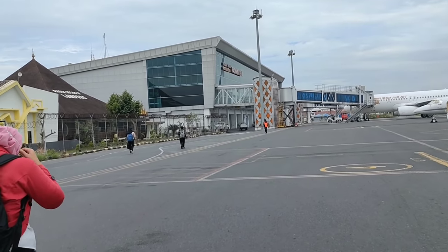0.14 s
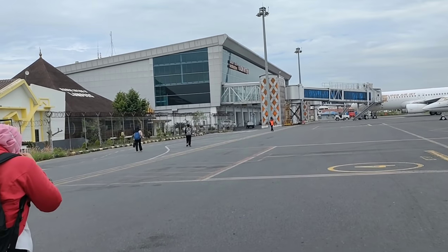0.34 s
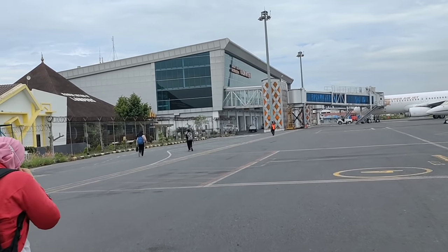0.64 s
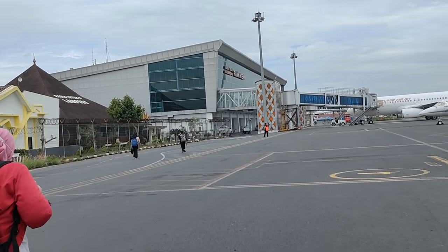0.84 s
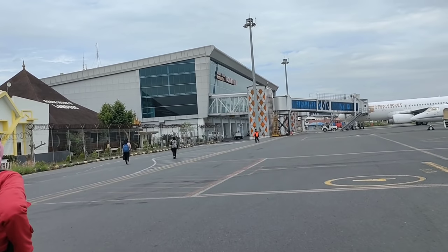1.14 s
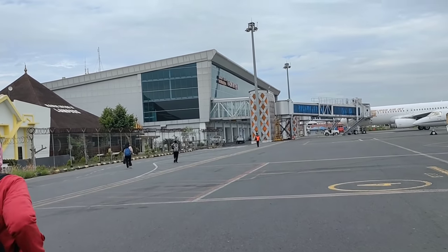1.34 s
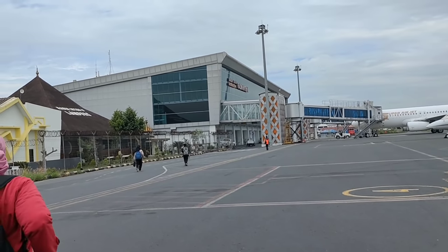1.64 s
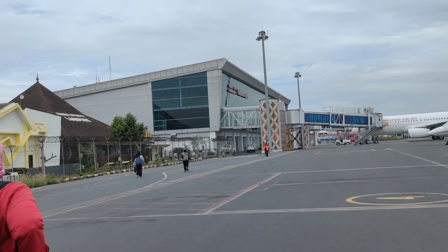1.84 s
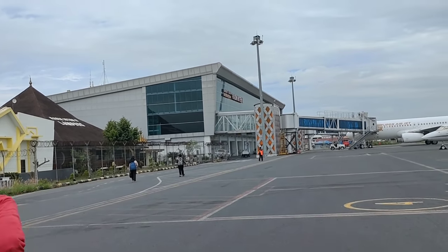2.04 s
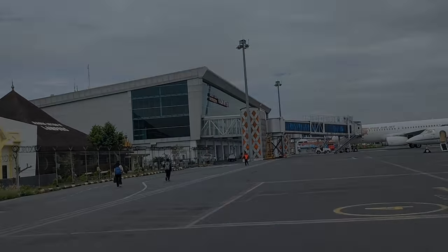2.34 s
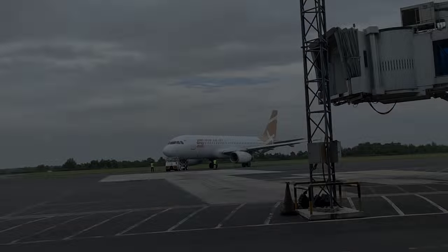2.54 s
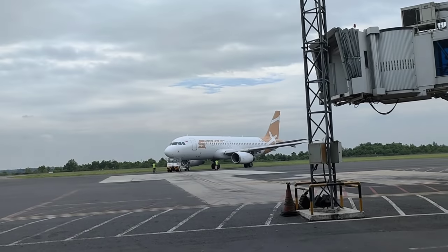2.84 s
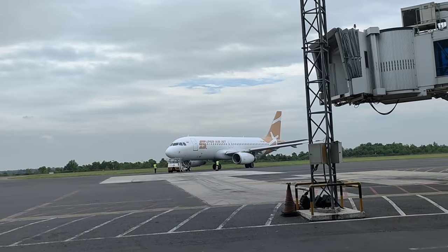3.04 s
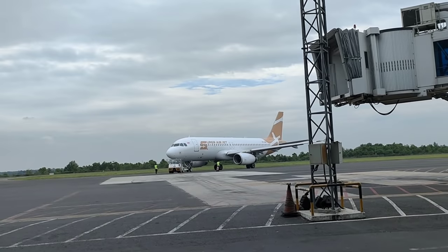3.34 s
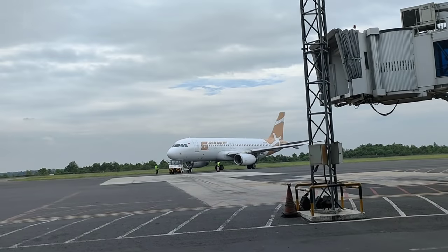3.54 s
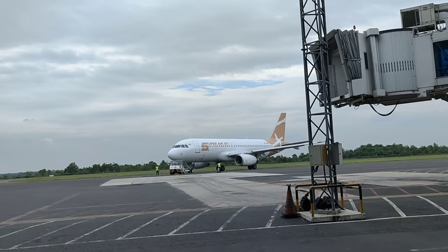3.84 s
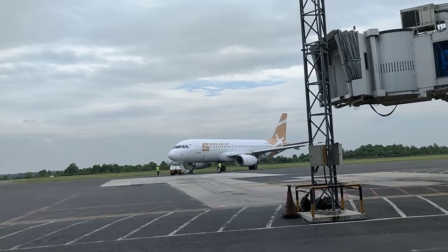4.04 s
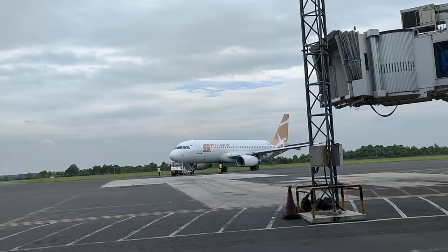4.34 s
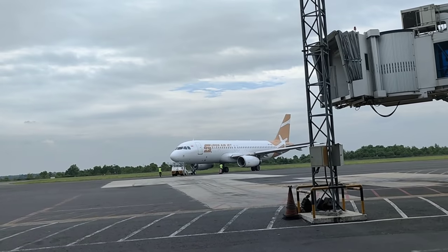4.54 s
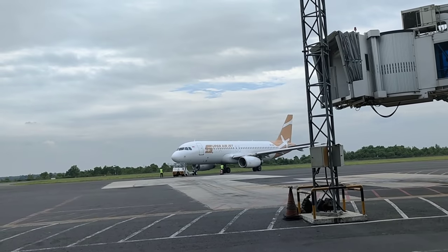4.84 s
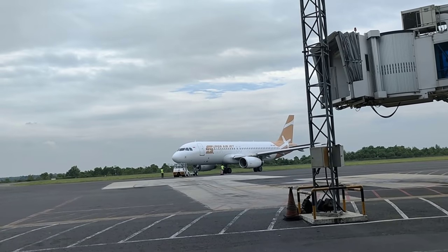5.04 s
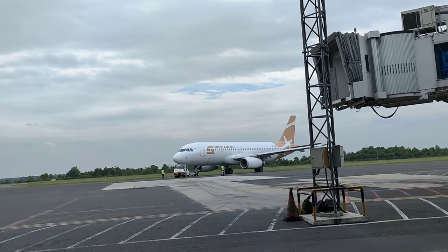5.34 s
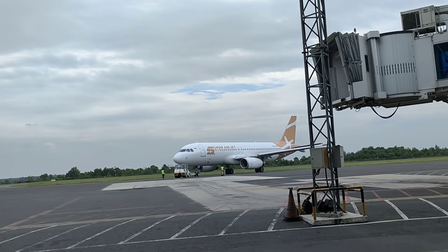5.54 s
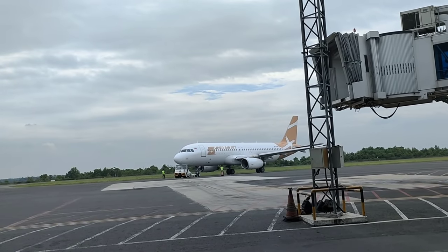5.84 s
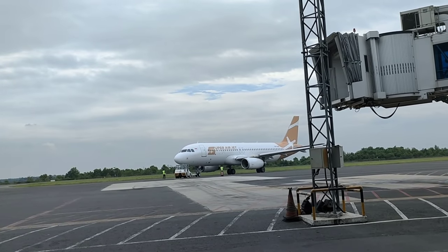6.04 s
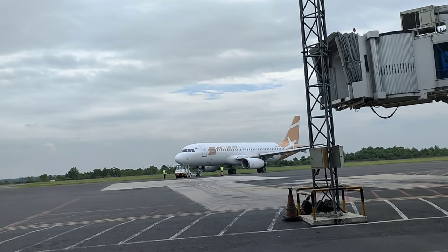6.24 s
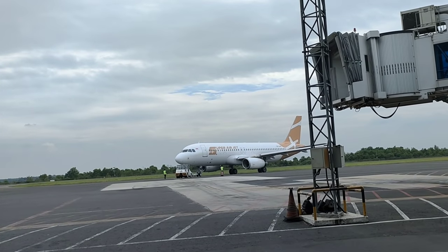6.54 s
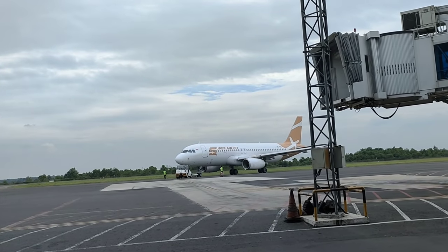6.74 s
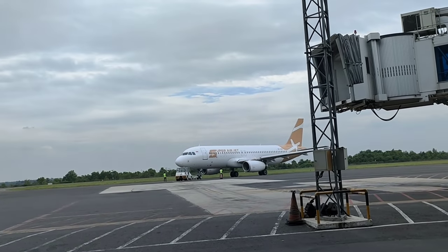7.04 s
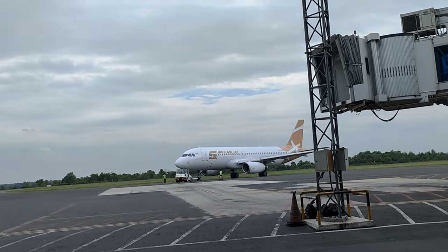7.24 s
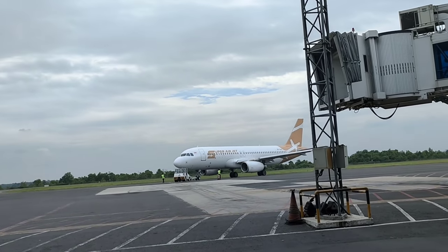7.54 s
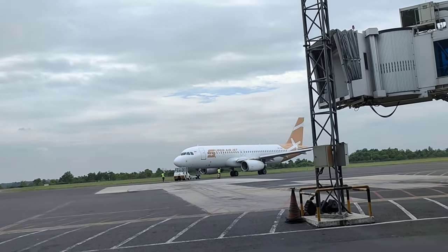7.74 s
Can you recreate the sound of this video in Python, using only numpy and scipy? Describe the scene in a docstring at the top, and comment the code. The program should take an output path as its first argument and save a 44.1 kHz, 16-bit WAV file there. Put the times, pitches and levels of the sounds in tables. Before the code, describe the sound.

Idling jet engines rush and whine across an open apron with wind buffets, fade through brief silence, then return nearer, one spooling up slightly.

```python
"""Jet exhaust rushes under a turbine whine that swells and sinks, a diesel drones and wind buffets the ports;
after a fade through silence the jets are nearer, and one spools up a little.
Jets idle on an open apron, heard first by the terminal, then by a jet bridge. Exhaust and wind are shaped
noise; blades, compressor, diesel and spooling engine are tones of wandering strength and phase."""
import sys
import numpy as np
from scipy import signal
from scipy.fft import irfft
from scipy.io import wavfile
from scipy.ndimage import uniform_filter1d

SR = 44100
rng = np.random.default_rng(int(sys.argv[2]) if len(sys.argv) > 2 else 0)


def waveform_to_disk(signal):
    """Save audio, clipped to [-1, 1], as 16-bit WAV at the path in sys.argv[1]."""
    frames = np.transpose(np.atleast_2d(signal))
    scaled = np.clip(frames, -1, 1) * 32767
    samples = np.round(scaled).astype(np.int16)
    wavfile.write(sys.argv[1], SR, samples)


N = 348390


def gain_of(db):
    """Decibels to amplitude."""
    return 10 ** (np.asarray(db) / 20)


def evened(x):
    """Scales to an rms of one."""
    return x / np.sqrt(np.mean(abs(x) ** 2) + 1e-20)


def read(points, hz):
    """A spectrum joined by straight lines over log frequency."""
    f, value = np.transpose(points)
    return np.interp(np.log(hz + 1), np.log(f + 1), value)


def follow(rows, t):
    """Each column of a curve at the times t."""
    s, *columns = np.transpose(rows)
    return [np.interp(t, s, column) for column in columns]


def bump(t, peak_s, length_s):
    """A Gaussian rise and fall of height one; length is its half-width at 1/e."""
    return np.exp(-((t - peak_s) / length_s) ** 2)


def drift(width_hz):
    """Slow complex chance of rms one, within the given bandwidth."""
    step = 100  # samples between the drawn points
    f = np.fft.fftfreq(4096, step / SR)
    phases = np.exp(2j * np.pi * rng.random(len(f)))
    z = np.fft.ifft(phases / np.sqrt(1 + (2 * f / width_hz) ** 4))
    return evened(np.interp(np.arange(N) / step, np.arange(len(f)), z))


def drift_pair(width_hz, same):
    """Slow chance at the two ports, partly shared."""
    same = np.clip(same, 0, 1)
    left = drift(width_hz)
    right = same * left + np.sqrt(1 - same ** 2) * drift(width_hz)
    return np.array([left, right])


def sides(lr_db):
    """Left and right gains of mean power one."""
    g = gain_of([lr_db / 2, -lr_db / 2])
    return g / np.sqrt(np.mean(g ** 2, 0))


def tone(hz, fading):
    """A tone on a pitch curve, with the wandering strength and phase that the air gives it."""
    angle = 2 * np.pi * np.cumsum(hz * np.ones(N)) / SR
    return np.sqrt(2) * (fading * np.exp(1j * angle)).real


def exhaust(spectrum, same, side, level_db, patchy_db, flutter_db, wander_db):
    """Jet mixing noise; turbulence makes it swell and flutter, the treble most."""
    # treble colour of the microphone ports, which ring near 9 kHz: f/Hz, gain/dB
    port_colour = [(6900, 0), (7400, -6), (7700, 2), (8200, -4), (8450, -0.5), (9050, 12.5), (9600, -7.5),
                   (10200, -21), (11300, -21), (12200, -30.5), (13700, -19.5), (15300, -35)]
    # the air carries the exhaust over more or less strongly: peak t/s, length/s, change/dB
    rush_swells = [(.14, 0.064, 1), (1.59, 0.38, 4), (2.322, 0.18, 5), (3.277, 0.088, 2.5),
                   (3.67, 0.033, -2), (4.14, 0.053, 0), (5.3, 0.64, 1.5), (6.53, 0.03, 0),
                   (7.304, 0.47, 2.5)]
    # how far each frequency follows the swells: f/Hz, share
    swell_share = [(600, 0.044), (2400, 0.25), (5200, 0.88)]
    # movement of the middle of the roar: t/s, change/dB before its band share
    roar_level = [(0, 3), (.6, 1.5), (.75, 1.5), (1.5, -3), (2.3, 0.5), (3.0, -0.1), (4.8, -0.8), (5.1, 0),
                  (6.25, 1), (6.7, 1), (7.9, -0.5)]
    # band that this moves: f/Hz, share
    roar_band = [(300, 0), (650, 0.86), (950, 0.71), (1500, 0.3), (2000, 0)]
    window, hop = 2048, 512
    hz = np.fft.rfftfreq(window, 1 / SR)
    t = np.arange(N // hop + 3) * hop / SR

    def framed(x):
        return evened(np.interp(t * SR, np.arange(N), x))

    a, b, c, d, patches = rng.standard_normal((5, len(t), len(hz)))
    patches = uniform_filter1d(patches, size=9, axis=0)
    patches = evened(uniform_filter1d(patches, size=40, axis=1))
    field_db = level_db + read(spectrum, hz) + read(port_colour, hz) + patchy_db * patches

    swell_db = sum(db * bump(t, s, length) for s, length, db in rush_swells)
    swell_db += wander_db * framed(drift(6).real)
    field_db += np.outer(swell_db, read(swell_share, hz))
    field_db += np.outer(follow(roar_level, t)[0], read(roar_band, hz))
    flutter_share = read([(300, 0.087), (4000, 0.44)], hz)
    field_db += flutter_db * np.outer(framed(drift(55).real), flutter_share)

    likeness = np.clip(read(same, hz), -1, 1)
    left = a + 1j * b
    right = likeness * left + np.sqrt(1 - likeness ** 2) * (c + 1j * d)
    z = np.array([left, right]) * gain_of(field_db) * sides(read(side, hz))[:, None]
    _, rush = signal.istft(z.transpose(0, 2, 1), SR, nperseg=window, noverlap=window - hop, scaling="psd")
    return rush[:, :N]


def whine(partials, blade_hz, twin_db):
    """Blade tones swell and sink in the air and beat with a slower twin; scattered paths differ at each port."""
    # scattered paths make each harmonic waver: harmonic, share of the direct sound
    whine_scatter = [(1, .08), (2, .07), (3, .25), (4, .22)]
    # the second turbine runs slightly flat: t/s, lag/Hz at the first harmonic
    twin_flat = [(3.0, 2.75), (4.3, 2.7), (4.9, 3.4), (5.8, 3.85), (6.3, 3.1), (6.75, 2.3), (7.9, 2.25)]
    in_step_s, twin_tilt_db, scatter_hz = 3.2, -4, 6  # the twin is duller: tilt is per harmonic
    t = np.arange(N) / SR
    speed_hz = blade_hz + 0.24 * drift(0.92).real
    lag_turns = np.cumsum(follow(twin_flat, t)[0]) / SR
    lag_turns -= np.interp(in_step_s, t, lag_turns)
    out = np.zeros((2, N))
    for k, (curve, (_, scatter)) in enumerate(zip(partials, whine_scatter), 1):
        level_db, side_db = follow(curve, t)
        twin = gain_of(twin_db + twin_tilt_db * k) * np.exp(-2j * np.pi * k * lag_turns)
        fading = evened(1 + twin + scatter * drift_pair(scatter_hz, 0))
        out += gain_of(level_db) * sides(side_db) * tone(k * speed_hz, fading)
    return out


def narrow_tones(rows, side, same, steady):
    """Machine tones, each a steady core blurred by reflections and unsteady running."""
    out = np.zeros((2, N))
    for hz, width_hz, db in rows:
        fading = evened(steady + drift_pair(width_hz, same))
        out += gain_of(db) * sides(read(side, hz))[:, None] * tone(hz, fading)
    return out


def by_terminal():
    """Farther from the jets: a duller, quieter rush; the whine comes and goes as the microphone moves."""
    # exhaust noise: f/Hz, relative density/(dB per Hz)
    rush_spectrum = [(25, -63), (105, -61.5), (170, -50), (245, -49), (300, -57.5), (350, -55), (400, -57),
                     (530, -67), (680, -60.5), (920, -61.5), (1040, -61.5), (1150, -67), (1400, -68),
                     (1600, -72), (2100, -65), (2450, -68.5), (2950, -68.5), (3350, -70.5), (3700, -70),
                     (3950, -68.5), (4400, -76), (4900, -76.5), (5200, -75), (6100, -85.5), (6850, -87),
                     (7400, -91.5), (9100, -102.5), (10200, -87.5)]
    # left-right likeness: f/Hz, correlation (-1 to 1)
    same_at = [(60, 0.3), (290, 0.9), (640, 1), (1410, 0.2), (3100, -0.43), (6800, 0)]
    # balance: f/Hz, left minus right/dB
    side_at = [(100, -4), (240, 0.5), (1000, -0.5), (3000, -1.5), (4500, 0.5), (6500, 5.5), (7600, 2),
               (9000, 5)]
    # whine, a curve for each of the first four blade harmonics: t/s, level/dB, left minus right/dB
    whine_curves = [
        [(0, -37, 4), (.32, -34, 2), (.55, -37, 7), (.9, -36.5, 2), (1.12, -52, 13), (1.45, -43, 7),
         (1.6, -54, 5), (1.8, -57, 2), (1.92, -40.5, 0), (2.05, -42.5, 3), (2.25, -35.5, 5)],
        [(.1, -47, 4), (.3, -37, 18), (.75, -35.5, -2), (1.05, -46, 12), (1.3, -35.5, 7), (1.45, -30.5, 5),
         (1.6, -37.5, 5), (1.72, -34, 4), (1.9, -37.5, 7), (2.3, -41.5, -6)],
        [(.3, -53, -3), (.7, -46, 6), (.9, -40, 5), (1.0, -38.5, 7), (1.1, -37, 1), (1.3, -57, 1),
         (1.7, -42, -3), (1.85, -50, 6), (1.98, -41, -2), (2.1, -58, 0)],
        [(0, -38, -8), (.09, -53, -7), (.17, -38.5, -9), (.27, -56, -5), (.45, -50, -7), (.62, -60, 0),
         (.78, -45, 3), (1.0, -52, -2), (1.3, -45.5, 0), (1.8, -53, -2), (2.0, -59, 2)],
    ]
    # thin compressor tones: f/Hz, width/Hz, level/dB
    compressor_tones = [(2562, 5, -50), (3226, 12, -55), (3648, 14, -62), (3871, 16, -58),
                        (3910, 14, -59.5), (4517, 8, -60.5), (5125, 10, -59.5), (6944, 10, -71),
                        (7687, 14, -77), (8716, 14, -81), (9065, 14, -76)]
    # diesel, near multiples of its shaft speed: f/Hz, width/Hz, level/dB
    diesel_tones = [(62.9, 4.7, -38.5), (229, 30, -38.5)]
    rush = exhaust(rush_spectrum, same_at, side_at,
                   level_db=-0.66, patchy_db=1.1, flutter_db=3.0, wander_db=1.0)
    blades = whine(whine_curves, blade_hz=645.5, twin_db=-18)
    compressor = narrow_tones(compressor_tones, side_at, same=0.3, steady=.8)
    diesel = narrow_tones(diesel_tones, side_at, same=0.7, steady=4.6)
    return rush + blades + compressor + diesel


def port_rumble(edge_hz):
    """Low pressure noise of air moving over a port."""
    hz = np.fft.rfftfreq(N, 1 / SR)
    shape = hz ** 2 / (hz ** 2 + 18 ** 2) / np.sqrt(1 + (hz / edge_hz) ** 6)
    phases = np.exp(2j * np.pi * rng.random(len(hz)))
    return evened(irfft(shape * phases, N))


def breeze(edge_hz, lumpy_db, lump_hz, side_db):
    """Small eddies come at random, unrelated at each port, as the breeze rises and dies away."""
    # the breeze as a whole: peak t/s, length/s, level at the peak/dB
    s, length, db = (1.05, 1.2, -37)
    lumps = evened(gain_of(lumpy_db * drift_pair(lump_hz, 0).real))
    rumble = np.array([port_rumble(edge_hz), port_rumble(edge_hz)])
    rise_and_fall = bump(np.arange(N) / SR, s, length)
    return gain_of(db) * sides(side_db)[:, None] * rise_and_fall * lumps * rumble


def wind(level_db):
    """Each strong eddy is a short swell of low pressure noise, with its own upper edge."""
    # strongest eddies: peak t/s, length/s, relative level/dB, upper edge f/Hz, power share on the right (0-1)
    eddies = [(.662, 0.079, -18, 190, 0.97), (0.772, 0.03, -19.5, 250, .88),
              (0.943, 0.069, -23.5, 260, 0.97), (1.36, 0.022, -18, 232, 0.9), (1.386, 0.032, -17, 45, 0),
              (1.104, .03, -21, 45, .2), (1.618, 0.015, -15.5, 260, 0.13), (1.7, 0.029, -16, 336, 0),
              (1.744, 0.011, -18, 400, 0.03), (1.769, 0.019, -13, 170, 1), (1.806, 0.11, -21, 48, 0),
              (1.984, .012, -14, 220, 0.03), (1.877, .04, -20, 60, 0.2), (2.767, 0.034, -26, 70, .5),
              (2.94, 0.076, -29, 70, 0.6)]
    t, out = np.arange(N) / SR, np.zeros((2, N))
    for s, length, db, edge_hz, right in eddies:
        right = np.clip(right, 0, 1)
        pan = np.sqrt([[1 - right], [right]])
        out += pan * gain_of(db + level_db) * port_rumble(edge_hz) * bump(t, s, length)
    return out


def buffet(push):
    """A sharp eddy hits the left port: a quickly damped thud, then a low suction."""
    # the hit: onset t/s, scale of thud and shove/dB, pitch f/Hz, decay/s
    s, db, hz, decay = (1.8645, -2.5, 200, .0028)
    age = np.maximum(np.arange(N) / SR - s, 0)
    u = age / decay
    thud = -u * np.exp(1 - u) * np.cos(2 * np.pi * hz * age)
    shove = push * u * (1 - u / 4) * np.exp(-u / 2)  # turns to suction after four decays
    return np.array([[1], [.03]]) * gain_of(db) * (thud + shove)


def spooling():
    """Neighbouring shaft orders climb together, and grow, as the engine on the right gathers speed."""
    # speed and strength: t/s, shaft f/Hz, relative level/dB
    speed_curve = [(2.5, 112.4, -1), (3.7, 113.05, -1), (5.0, 113.4, 0), (5.7, 113.6, -3), (6.3, 114.7, 3),
                   (7.0, 116.1, 2.5), (7.3, 116.6, 5), (7.9, 117.65, 4)]
    # tones: multiple of the shaft speed, relative level/dB
    shaft_orders = [(21, -50), (22, -42.5), (23, -43.5), (24, -51)]
    shaft_hz, level_db = follow(speed_curve, np.arange(N) / SR)
    tones = np.zeros((2, N))
    for k, db in shaft_orders:
        fading = evened(.6 + drift_pair(4, .6))
        tones += gain_of(db) * tone(k * shaft_hz, fading)
    return sides(-6)[:, None] * gain_of(level_db) * tones


def by_bridge():
    """Nearer to the jets, which stand a little to the right."""
    # exhaust noise: f/Hz, relative density/(dB per Hz)
    rush_spectrum = [(25, -73.5), (50, -63), (105, -68), (170, -55), (260, -56), (450, -58), (1200, -57),
                     (1500, -61.5), (2500, -58.5), (3100, -62), (3800, -62), (4700, -70), (5450, -72),
                     (6100, -75), (6700, -81), (7100, -82), (8200, -91)]
    # left-right likeness: f/Hz, correlation (-1 to 1)
    same_at = [(60, 0.98), (130, 1), (290, 0.93), (640, 0.63), (1410, -0.41), (3100, -0.17),
               (6820, 0.000047), (15000, -0.01)]
    # balance: f/Hz, left minus right/dB
    side_at = [(60, -0.5), (99, 1), (160, 0), (270, 1), (450, 0.5), (740, -3.5), (1220, -0.5), (2010, -5),
               (3330, -5.5), (5500, -1), (9080, 3.5), (15000, 8)]
    # whine, a curve for each of the first four blade harmonics: t/s, level/dB, left minus right/dB
    whine_curves = [
        [(2.7, -39, 4), (3.1, -35.5, 2), (3.55, -34, 2.5), (4.1, -35.5, -2), (4.4, -32.5, -3),
         (4.85, -39.5, -2), (5.25, -35, 8), (5.5, -34, 3), (5.8, -35.5, 4), (6.05, -33, -1), (6.38, -29.5, -3),
         (6.65, -34.5, -1), (6.9, -33, 1), (7.2, -31.5, 6), (7.45, -31, -4), (7.68, -31, -2), (7.9, -39, 3)],
        [(2.6, -35, -1), (2.82, -32, 1), (3.0, -33, 8), (3.5, -34, 1), (3.8, -30, 0), (4.25, -32.5, -1.5),
         (4.6, -30.5, 5), (4.67, -42, 14), (4.8, -33, 2), (5.03, -32, 5), (5.14, -40, -10), (5.27, -29.5, 1),
         (5.36, -34.5, 4), (5.45, -33, 11), (5.62, -32.5, 11), (5.8, -34, 7), (5.95, -45, 6), (6.2, -34, -1),
         (6.42, -31, -6), (6.72, -39.5, -5), (7.22, -40, 0), (7.5, -37, 1), (7.87, -32, -11)],
        [(3.0, -43.5, 0), (3.6, -43.5, -4), (4.0, -44.5, -3), (5.5, -44, 4), (6.1, -42.5, 0), (6.7, -40.5, -4),
         (7.03, -49, -6), (7.42, -40.5, -4), (7.9, -41.5, -6)],
        [(2.75, -47, -6), (3.05, -36.5, -11), (3.35, -39, -1), (3.57, -26.5, -7), (3.8, -40, -5),
         (4.13, -34, -8), (4.28, -55, -3), (4.47, -35.5, -12), (4.6, -44, 0), (4.75, -37.5, 1),
         (5.0, -39.5, -7), (5.12, -55, -3), (5.3, -35.5, -4), (5.6, -35.5, -14), (5.88, -32, -16),
         (6.05, -49, -7), (6.3, -37, -13), (6.7, -38, -9), (7.0, -37, 0), (7.3, -36, -14), (7.9, -35, -14)],
    ]
    # thin compressor tones: f/Hz, width/Hz, level/dB
    compressor_tones = [(3215, 11, -44), (3605, 11, -51), (3639, 14, -48.5), (3860, 16, -48),
                        (3886, 16, -51), (4501, 24, -57.5), (4823, 28, -55.5), (5450, 40, -62),
                        (6105, 16, -62), (6918, 14, -60.5), (9022, 20, -64)]
    # diesel, firing tone then overtones: f/Hz, width/Hz, level/dB (relative for the overtones)
    diesel_tones = [(64.6, 2, -46), (133, 8, -48), (165, 14, -41), (197, 15, -38.5), (236, 11, -37.3),
                    (266, 7, -39.7), (424, 10, -45.5)]
    # movement of the diesel's overtones: t/s, change/dB
    overtone_level = [(2.7, 1), (3.2, -2), (3.45, 3), (3.85, 0), (4.3, 1.5), (4.9, 4), (5.5, 1), (6.5, 1.5),
                      (7.1, 3.5), (7.4, 0), (7.9, 3)]
    rush = exhaust(rush_spectrum, same_at, side_at,
                   level_db=-0.3, patchy_db=0.63, flutter_db=1.95, wander_db=.4)
    blades = whine(whine_curves, blade_hz=643.1, twin_db=-4.2)
    compressor = narrow_tones(compressor_tones, side_at, same=.5, steady=.9)
    firing = narrow_tones(diesel_tones[:1], side_at, same=1.0, steady=1.4)
    overtones = narrow_tones(diesel_tones[1:], side_at, same=0.95, steady=.3)
    overtones *= gain_of(follow(overtone_level, np.arange(N) / SR)[0])
    return rush + blades + compressor + firing + overtones + spooling()


def scene():
    """The first place fades to silence and the second fades in; the breeze dies away across the change."""
    cut_s, silence_s = 2.494, .014
    fade_out_s, fade_out_power, fade_in_s = .5, 1.1, .49
    t = np.arange(N) / SR
    air = breeze(edge_hz=58, lumpy_db=9.5, lump_hz=16, side_db=0) + wind(level_db=-4.5) + buffet(push=0.32)
    apron = np.where(t < cut_s, by_terminal(), by_bridge()) + air
    away_s = np.maximum(abs(t - cut_s) - silence_s / 2, 0)
    fade_out = (away_s / fade_out_s) ** fade_out_power
    fade_in = away_s / fade_in_s
    return apron * np.minimum(np.where(t < cut_s, fade_out, fade_in), 1)


def record(dry):
    """Limits the band with a linear-phase low-pass, after a soft start and stop."""
    edge_hz, end_fade_s = 15300, .004
    t = np.arange(N) / SR
    ends = np.minimum(np.minimum(t, t[::-1]) / end_fade_s, 1)
    low_pass = signal.firwin(511, edge_hz, window=("kaiser", 9), fs=SR)
    return signal.oaconvolve(dry * ends, low_pass[None], "same")


dry = scene()
out = record(dry)
waveform_to_disk(out)
```